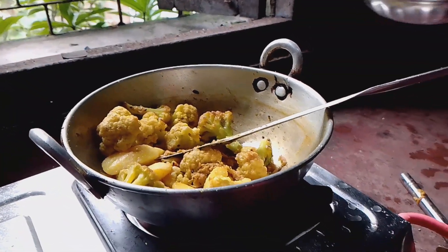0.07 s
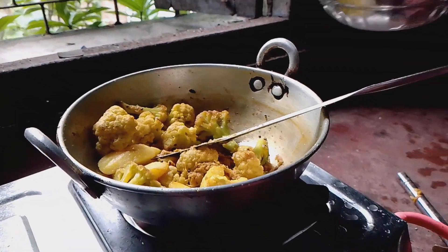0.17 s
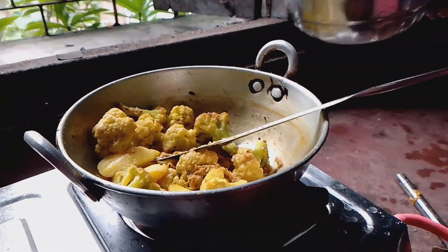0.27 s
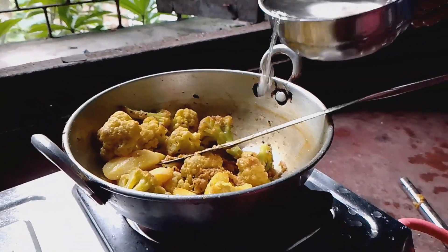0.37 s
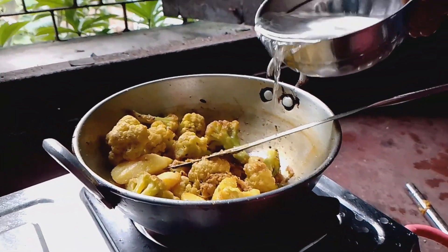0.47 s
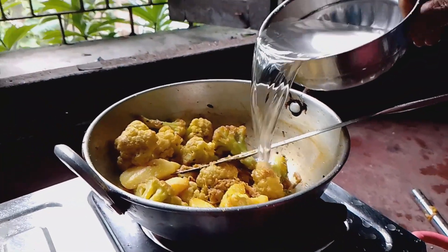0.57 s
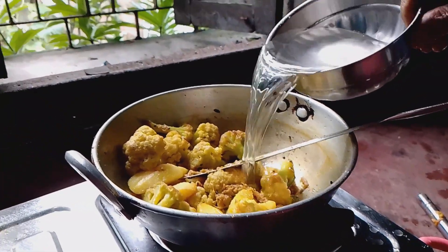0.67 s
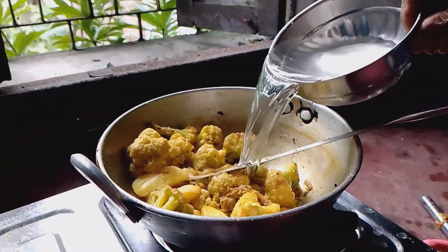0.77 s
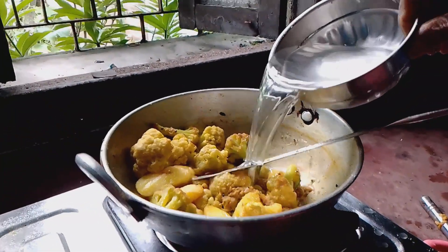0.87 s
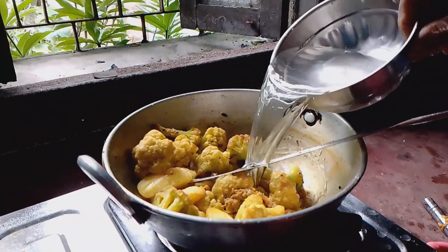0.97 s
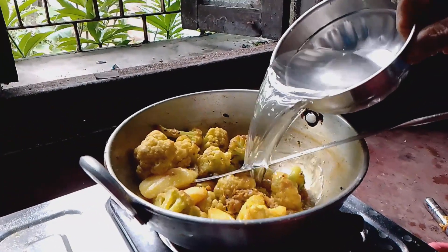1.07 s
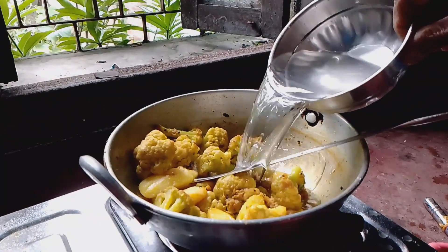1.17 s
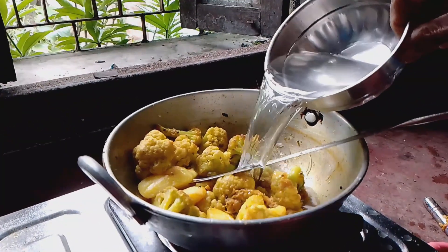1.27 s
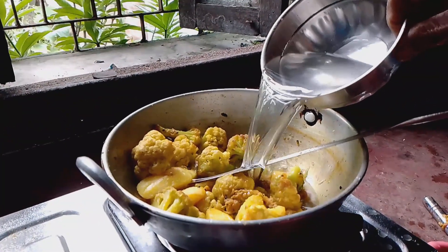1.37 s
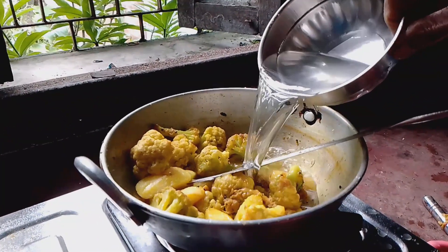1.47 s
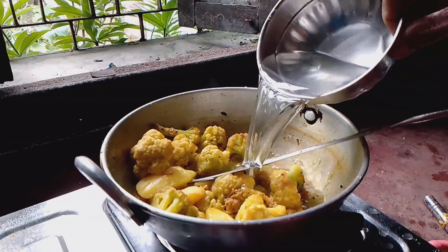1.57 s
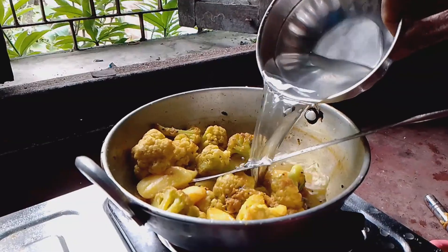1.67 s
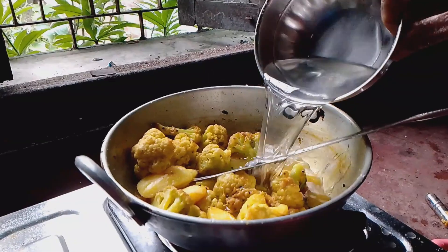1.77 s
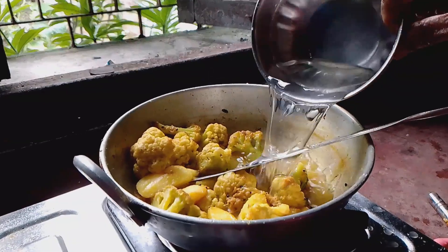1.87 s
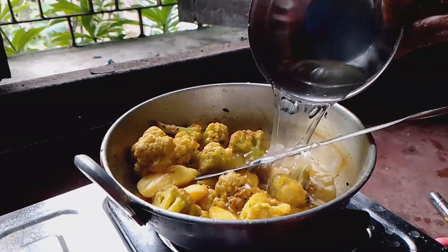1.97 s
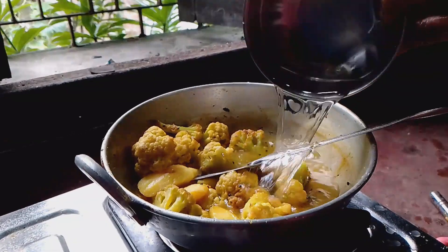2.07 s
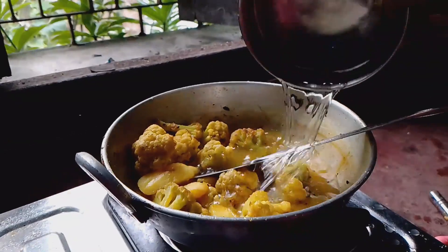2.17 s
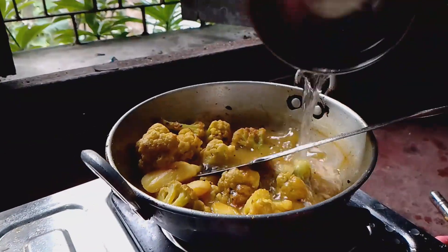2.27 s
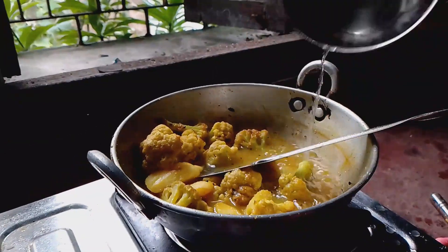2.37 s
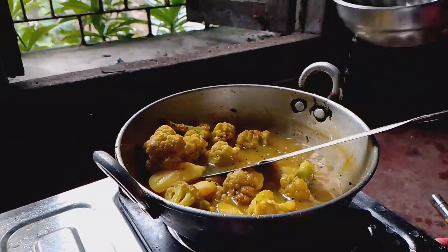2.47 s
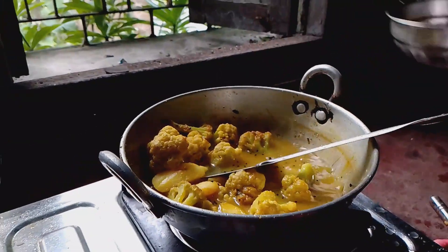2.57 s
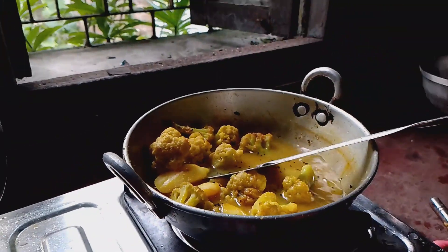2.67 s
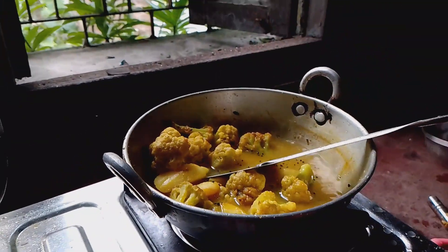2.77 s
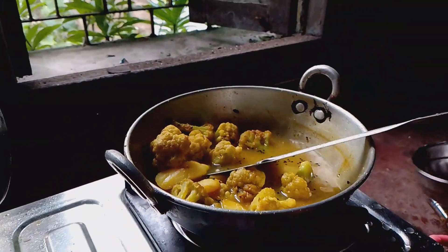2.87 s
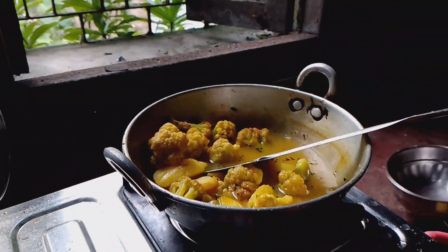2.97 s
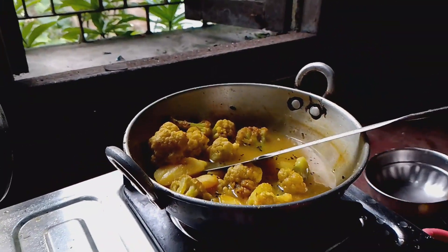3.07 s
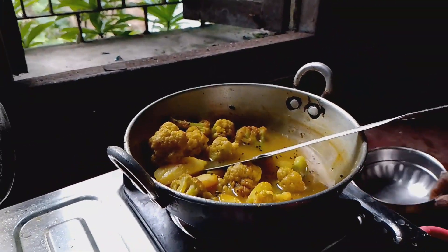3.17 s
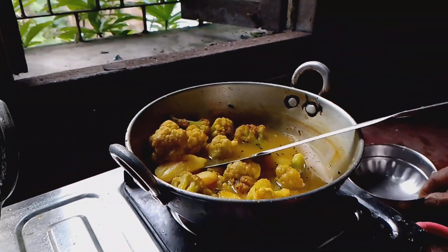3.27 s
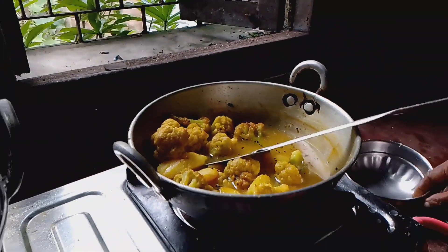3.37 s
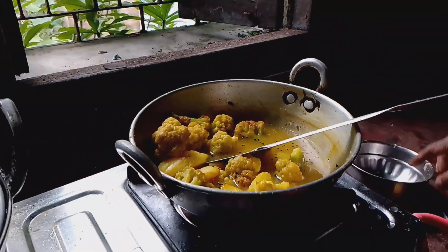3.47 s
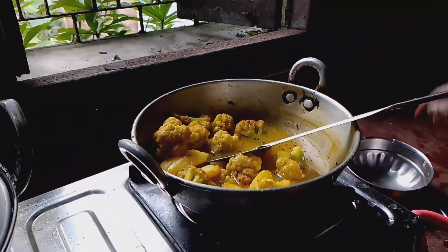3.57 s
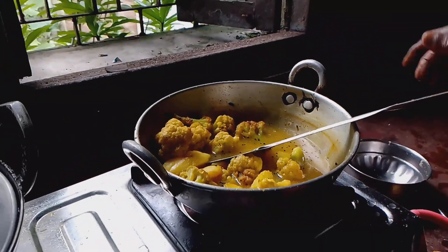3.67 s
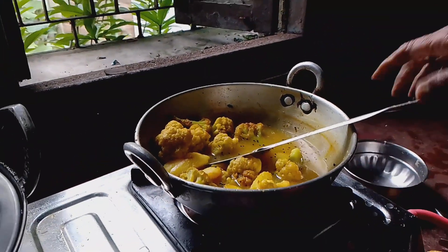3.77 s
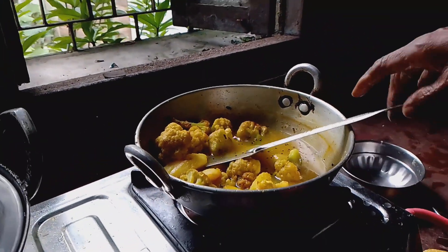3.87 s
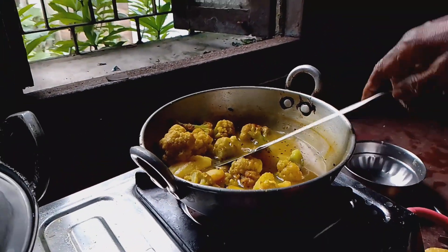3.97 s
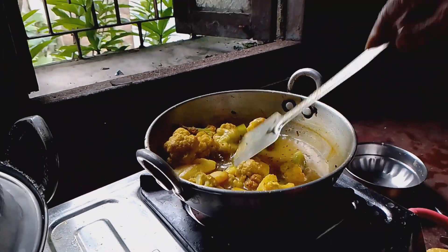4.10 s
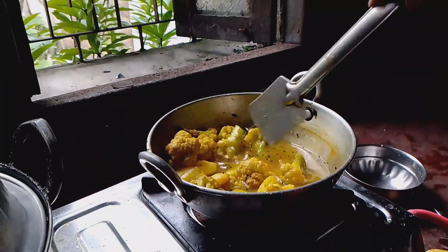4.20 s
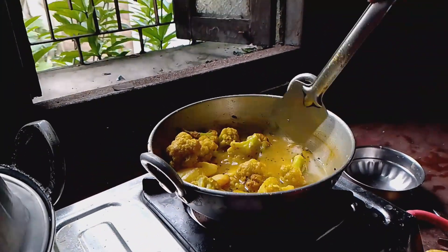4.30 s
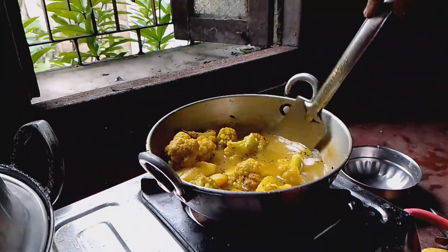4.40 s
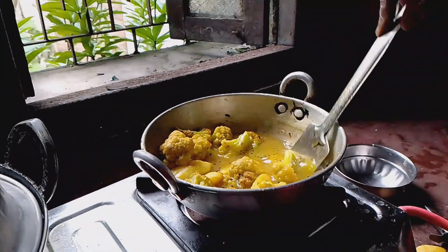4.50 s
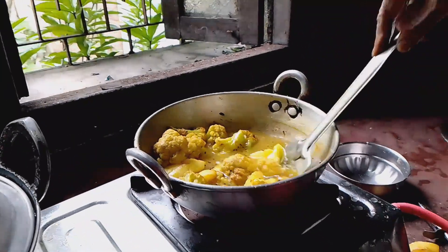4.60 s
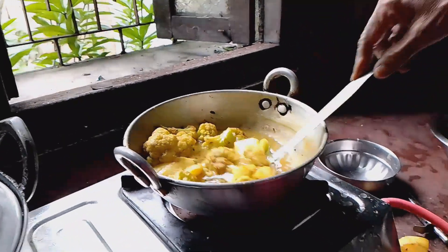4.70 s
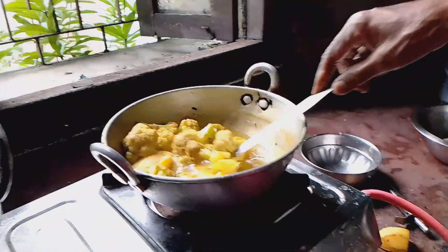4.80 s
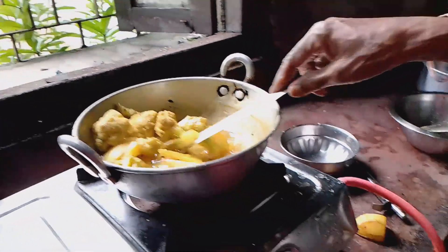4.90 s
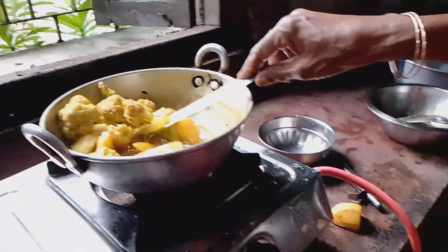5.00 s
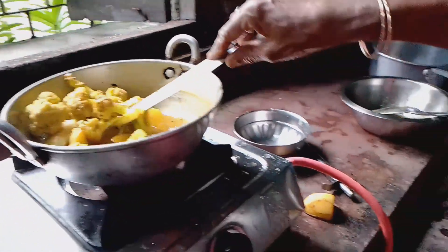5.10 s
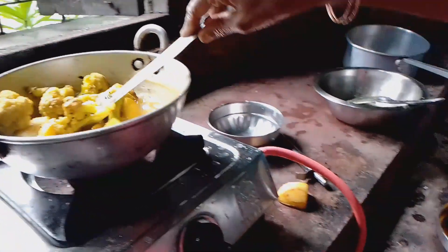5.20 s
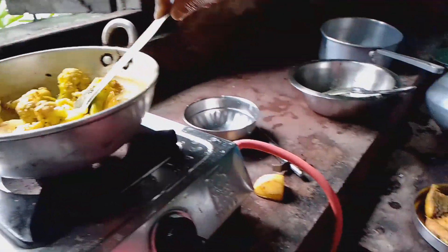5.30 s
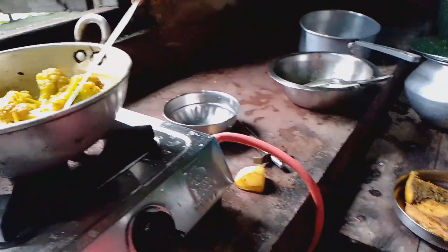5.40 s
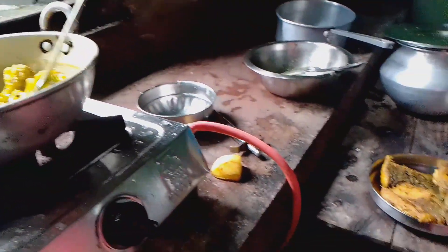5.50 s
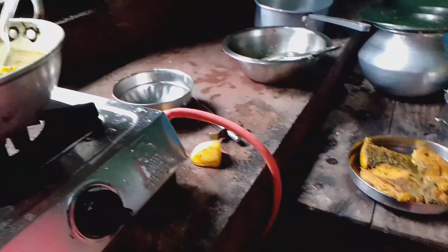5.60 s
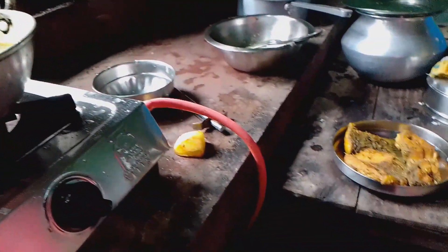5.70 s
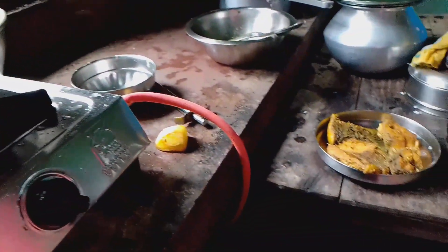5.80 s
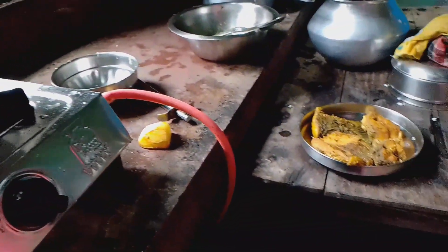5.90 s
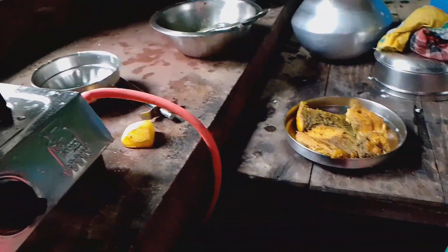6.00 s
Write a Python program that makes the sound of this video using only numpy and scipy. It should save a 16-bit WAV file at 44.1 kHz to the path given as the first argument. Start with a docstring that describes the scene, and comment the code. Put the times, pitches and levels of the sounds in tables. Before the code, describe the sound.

Close, in a small kitchen with a short, lively echo. Vegetables sizzle steadily in hot oil, a dense bright crackle over a faint gas-flame rush. From about 0.45 s first drops snap, and at 0.55 to 1 s poured water makes the frying flare into a loud steam hiss that climbs in pitch, with gurgling notes. The hiss falls away quickly; gurgles last until about 1.6 s, while drips and tiny spits thin out until about 2.8 s, leaving a soft simmer. At 3.3 s an empty steel bowl lands with a ringing clink, then rattles from 3.5 to 4 s. At 4.4 s a spatula knocks the pan brightly with a tiny squeak, its ring sliding downward as it sinks. Short gritty scrapes and light knocks follow until 5.7 s, with a dull tap near 5.4 s. At 5.9 s the blade clangs and rings, with a last scrape and squeak at 6 s.

```python
"""Vegetables sizzle in a steel pan over a gas burner in a small kitchen: coloured trains of tiny bursts.
Poured water makes the frying flare up as steam noise, gurgle (gliding tones) and die to a simmer.
The empty steel bowl is set down and rattles; a metal spatula knocks the pan, stirs and squeaks.
Blows excite decaying modes and a noisy clash; strokes rasp through moving resonances."""
import sys
import numpy as np
from scipy import signal
from scipy.fft import rfft, irfft
from scipy.io import wavfile

SR = 44100
rng = np.random.default_rng(int(sys.argv[2]) if len(sys.argv) > 2 else 0)


def put_to_file(sound):
    """Save the sound as 16-bit audio at rate SR, in the file named by the first command-line argument."""
    columns = np.atleast_2d(sound).T  # one column per channel
    safe = np.clip(columns, -1, 1)
    whole_steps = np.round(safe * 32767)
    wavfile.write(sys.argv[1], SR, whole_steps.astype(np.int16))


N = 266805
TIME = np.arange(N) / SR
BAND_EDGE_HZ = 15900

# Oil fries steadily until water quenches it; frying dies faster once the pan's bottom is covered.
OIL_DB, QUENCH_S, COOLING_DB_PER_S = -29.1, 0.97, 10.5
COVERED_S, DROWNING_DB_PER_S = 2.6, 1.5
# Gushes of water, a first spill then the full stream. Each row: start in seconds, length in seconds,
# level in dB.
GUSHES = [(0.561, .13, -29), (0.716, 0.27, -23.1)]
FLARE_ATTACK_S, FLARE_FALL_DB_PER_S = 0.079, 25
# Fine, hissing mist from the full stream, before the spray colour.
MIST_DB, MIST_ATTACK_S, MIST_LENGTH_S, MIST_FALL_DB_PER_S = -34, 0.095, 0.42, 29
# Levels relative to the oil or the flare.
OIL_SPRAY_DB, OIL_SPLASH_DB = -17, -13.5
STEAM_DB, STEAM_SPLASH_DB, STEAM_LAG_S = -8, -17, 0.077
# Steam hiss rises in pitch as water covers the hot metal.
STEAM_HZ, STEAM_RISE_HZ_PER_S, STEAM_RISE_S, STEAM_WIDTH_HZ = 4300, 1650, 0.6, 900
# Bands of the frying sputter independently.
SPUTTER_DB, SPUTTER_HZ = 1.5, 14
SIMMER_DB = -49
# Drips as the stream thins.
DRIBBLE_S, DRIBBLE_LENGTH_S = 1.5, 1.3
DRIP_DB, DRIP_FADE_DB_PER_S, DRIP_SPREAD_DB = -25, 6.5, 5
DRIP_HZ, DRIP_SAG_HZ_PER_S, DRIP_PITCH_SPREAD, DRIP_T60_S = 4640, 600, 0.18, 0.0094
# Droplets spit off the rim.
SPITS_PER_S, SPIT_DB, SPIT_ATTACK_S, SPIT_LENGTH_S, SPIT_FALL_DB_PER_S = 45, -53, .3, .9, 16
STROKE_ATTACK_S, STROKE_FALL_DB_PER_S = 0.018, 204
# The ringing blade slides into the gravy, whose weight pulls its modes down.
SINK_START_S, SINK_TIME_S, SINK_HOLD_S = 4.434, .13, 0.023

# Spectral shapes of the sources. Each row: frequency in Hz, relative level in dB per Hz.
FRY_COLOUR = [(880, -86), (1450, -7), (1650, -19), (1940, -1.5), (2100, -11), (2330, -2), (2540, -9),
              (2770, 0), (3050, -3), (3500, -.5), (3900, .5), (4550, 4), (5100, 0.5), (5550, 0), (6050, -4),
              (6450, -12.5), (7700, -29), (11700, -31.5), (19800, -88)]
SPRAY_COLOUR = [(3820, -21.5), (6500, -3), (7700, -8), (11000, -8.5), (13800, -21), (15100, -15),
                (16000, -20)]
SPLASH_COLOUR = [(300, -39), (500, -14), (800, 0.5), (1150, -5.5), (1450, 0), (1900, 0), (2400, 2.5),
                 (3500, -41)]
SIMMER_COLOUR = [(900, -35), (1600, -3.5), (2300, 2.5), (3000, -3.5), (4300, -3.5), (5500, -7),
                 (7500, -16.5), (10500, -19), (14000, -29), (16000, -32)]
FLAME_COLOUR = [(25, -38), (45, -20), (88, -18.5), (104, -4), (130, -11), (162, -30.5), (215, -1), (310, 0),
                (440, -3), (620, -8), (900, -7), (1600, -12.5), (2600, -12), (6000, -36)]
SPIT_COLOUR = [(1000, -25), (4000, 0), (7000, -7), (13500, -9), (16000, -18)]
BOWL_COLOUR = [(240, -38), (400, -13), (700, -14), (850, -6), (1400, -2), (1570, -11), (1800, 5),
               (2120, -20), (2500, -16), (3660, -18), (4600, -12), (5300, -24), (9000, -37), (14000, -44)]
RATTLE_COLOUR = [(650, -32), (1100, -18), (1450, -31), (1720, 2), (1900, -16), (2330, 2.5), (2620, -6.5),
                 (3010, -14), (3200, -7.5), (3900, -8.5), (4600, -10.5), (5580, -18), (6400, -17.5),
                 (7550, -27), (11200, -27), (16000, -55)]
STIR_COLOUR = [(350, -15), (600, -6), (1030, -4.5), (1220, -6.5), (1720, -6.5), (2050, 1.5), (2800, -2),
               (3600, -3.5), (4300, -9), (5000, -4), (6300, -13), (7500, -24), (9800, -33), (14000, -42)]
PAN_COLOUR = [(290, -19), (500, -11), (1080, -3), (1740, -9), (2430, 0.5), (2980, -4), (4030, -2.5),
              (4660, -1), (5310, -5.5), (6330, -4), (7530, -11), (8830, -12.5), (9490, -11.5), (12000, -16),
              (16000, -34)]
# Resonances of burner and pan that the flame sings in. Each row: frequency in Hz, width in Hz,
# rms level in dB.
FLAME_MODES = [(313.3, 43.3, -49), (398.5, 8.1, -58.5), (833, 42, -77), (1176, 47, -82), (1409, 116, -55.5)]
# Air pockets ringing in the water. Each row: start in seconds, length in seconds, start pitch in Hz,
# end pitch in Hz, level in dB.
GURGLES = [(0.149, 0.053, 2880, 2560, -37), (0.336, 0.026, 1520, 1570, -36.5),
           (0.882, 0.043, 2260, 2350, -30), (0.99, 0.062, 2490, 2700, -34), (1.05, 0.061, 1780, 1800, -37),
           (1.119, .06, 1777, 1947, -35), (1.279, 0.073, 1740, 1920, -33.5), (1.324, 0.1, 1910, 1946, -39),
           (1.473, 0.053, 2500, 2640, -28.5), (1.526, 0.037, 1990, 1830, -37.5),
           (1.55, 0.079, 1796, 1794, -31.5), (4.971, .05, 1163, 1284, -46)]
# Loudest drops of water. Each row: start in seconds, level in dB, pitch in Hz, T60 in seconds.
DROPS = [(0.451, -27, 4600, .006), (.473, -16.5, 4500, 0.019), (.523, -20, 4400, .006),
         (.61, -21, 5280, .012), (.68, -19, 4470, .015), (.793, -16, 4060, .015), (.835, -16, 4610, .025),
         (.905, -18, 4360, .025), (.958, -18, 4510, .025), (1.421, -23, 5220, .015),
         (1.462, -24, 5180, .015), (1.525, -20, 5100, 0.012), (1.752, -26.5, 5000, 0.014),
         (2.068, -28, 3640, 0.027), (2.154, -23.5, 4550, 0.026), (2.259, -25.5, 4100, 0.019),
         (2.508, -28.5, 4050, 0.009), (2.688, -24, 3850, 0.01)]
# Modes of ringing steel. Each row: frequency in Hz, relative level in dB, T60 in seconds.
BOWL_MODES = [(850, -15.5, 0.5), (970, -16, 0.4), (1200, -17, 0.38), (1400, -14, .25), (1836, -3.5, 0.72),
              (2220, -8.5, 0.58), (2480, -3.5, 0.33), (2500, -6, 0.22), (3030, -7, .24), (3300, -7.5, 0.57),
              (3470, -7, 0.38), (4180, -12, .2), (4420, -6, 0.2), (4705, -6.5, 0.3)]
RATTLE_MODES = [(1736, -4, 0.53), (2150, -10, 0.82), (2360, -7, 0.54), (2384, -4.5, 0.45), (2660, -14, .32),
                (2960, 1, 0.26), (2960, -3.5, 0.14), (3350, -8, 0.4), (3420, -13, 0.26), (3763, -10, .25),
                (3950, -13, .22), (4005, -9, .25), (4160, -9, .22), (4260, -14, .16), (4370, -7, .17),
                (4670, -11, 0.31), (5450, -11, .15), (5690, -14, 0.26), (6300, -24, .2)]
PAN_MODES = [(1100, -12, 0.13), (2300, -8, 0.2), (2440, -4, 0.14), (2730, -10, 0.2), (2870, -12, .16),
             (3230, -6, .2), (3410, -3, 0.21), (3680, -9, 0.2), (4020, -10, 0.22), (4290, -8, .18),
             (4560, -3, 0.22), (4800, -2, 0.22), (5080, -3, .18), (5370, 5, 0.14), (5560, -2, 0.14),
             (5760, -3, .15), (6820, -11, 0.3)]
BLADE_MODES = [(988, -4.5, 0.27), (2400, 1, 0.26), (3310, -15, .5), (3990, -4, 0.33), (4200, -3, 0.14),
               (5060, -2, .22), (5300, -3, .17), (5798, -6, 0.26), (6030, -2, 0.23), (6740, -9, 0.24),
               (9570, -3, 0.091)]
# Blows. Each row: start in seconds, ring level in dB, clash level in dB, clash T60 in seconds,
# frequency in Hz that the point of contact favours.
BOWL_HITS = [(3.273, -37, -19.5, 0.06, 1140), (3.283, -38, -33, 0.22, 1150),
             (3.306, -30, -34.5, 0.69, 3020), (3.324, -29.5, -41, 0.34, 2020)]
RATTLE_HITS = [(3.511, -27, -29.5, 0.17, 4660), (3.521, -30.5, -32.5, 0.34, 4800),
               (3.59, -38, -37, 0.2, 4600), (3.621, -40, -25.5, 0.033, 4600),
               (3.701, -34, -22, 0.064, 4050), (3.712, -24.5, -28, 0.13, 3800),
               (3.722, -27.5, -29, 0.38, 3700), (3.779, -35, -34, .08, 3600),
               (3.851, -44, -33.5, 0.1, 4400), (3.863, -39.5, -35, 0.1, 4300), (3.88, -42, -35, .12, 3300),
               (3.966, -39, -34, 0.07, 4400), (3.984, -36, -33, 0.1, 2470), (3.993, -40, -35, 0.046, 2600),
               (4.022, -46, -39, 0.088, 4400)]
PAN_HITS = [(4.423, -31, -23, 0.2, 4600), (4.435, -23, -21, 0.056, 3070), (4.441, -35, -36, 0.18, 3250),
            (4.476, -46, -38, 0.4, 5500), (4.548, -46, -33.5, 0.09, 4800), (5.304, -44, -34, 0.04, 3200),
            (5.38, -47, -35, .08, 5000), (5.409, -47, -39, 0.055, 5000), (5.469, -50, -39.5, 0.1, 4320),
            (5.48, -50, -38, 0.13, 4320)]
BLADE_HITS = [(5.881, -25.5, -26, 0.09, 4400), (5.901, -34, -32, 0.2, 4300),
              (5.991, -42, -32.5, 0.11, 10000)]
# Strokes of the spatula. Each row: start in seconds, length in seconds, scrape level in dB,
# rasp level in dB, rasp start in Hz, rasp end in Hz, rasp width in Hz.
STROKES = [(3.831, 0.079, -40, -52, 2300, 2400, 400), (3.96, 0.073, -42, -46, 2410, 2250, 400),
           (4.47, .12, -43, -46, 3000, 2400, 900), (4.654, .05, -45, -59, 2800, 3100, 600),
           (4.696, 0.028, -44, -45, 5200, 4960, 800), (4.734, 0.034, -42, -49, 3800, 3500, 1400),
           (4.776, .02, -43.5, -40, 1980, 2096, 360), (4.823, 0.025, -46, -50, 4900, 4650, 1000),
           (4.85, 0.032, -45, -47, 2900, 2650, 900), (4.925, .04, -45, -51, 3700, 2300, 600),
           (5.005, 0.03, -50, -51, 2600, 2980, 900), (5.084, 0.033, -49, -49, 3070, 2480, 900),
           (5.225, .04, -52, -49, 2300, 2500, 600), (5.3, .03, -46, -42, 2950, 2700, 350),
           (5.394, 0.085, -55, -48, 2400, 2200, 420), (5.645, 0.035, -68, -50, 2860, 2800, 300),
           (5.974, .07, -40.5, -38, 2510, 2490, 300)]
# Modes of the sinking blade. Each row: frequency in air in Hz, frequency sunk in Hz, width in Hz,
# level in dB, fall in dB per second.
SINKING_MODES = [(2740, 1980, 340, -34.5, 65), (3480, 3050, 260, -39, 102), (5700, 5250, 380, -37, 94)]
# Blade sticking and slipping on steel. Each row: start in seconds, length in seconds, pitch in Hz,
# level in dB.
SQUEAKS = [(4.4348, .008, 5625, -13), (4.4375, 0.002, 5470, -9), (5.988, 0.024, 2406, -17),
           (6.018, 0.021, 2393, -27)]
# Dull tap close by. One row: centre in seconds, level in dB before the high-pass, time scale in seconds.
TAP = (5.3625, -16, 0.00019)
# Room decay. Each row: frequency in Hz, T60 in seconds.
ROOM_T60 = [(200, 0.45), (1500, 0.56), (5000, 0.51), (14000, 0.48)]


def amp(db):
    """Decibels to gain."""
    return 10 ** (np.asarray(db) / 20)


def unit(x):
    """Scales to rms 1."""
    return x / np.sqrt(np.mean(x ** 2) + 1e-20)


def read(points, hz):
    """Interpolates a spectrum table on a log-frequency axis."""
    f, value = np.transpose(points)
    return np.interp(np.log(hz + 1), np.log(f), value)


def add(mix, s, sound):
    """Mixes a sound in at s seconds."""
    part = mix[round(s * SR):][:len(sound)]
    part += sound[:len(part)]


def tint(x, colour):
    """Multiplies the spectrum of x by a colour, at rms 1."""
    gain = amp(read(colour, np.fft.rfftfreq(len(x), 1 / SR)))
    return unit(irfft(rfft(x) * gain, len(x)))


def drift(rate_hz):
    """Low-passed noise of rms 1: a slow random wander."""
    hz = np.fft.rfftfreq(N, 1 / SR)
    return unit(irfft(rfft(rng.standard_normal(N)) / (1 + (hz / rate_hz) ** 4), N))


def resonate(x, hz, width_hz):
    """Steep resonance, fixed or moving, at rms 1: shift to 0 Hz, low-pass, shift back."""
    turn = np.exp(2j * np.pi * np.cumsum(hz * np.ones(N)) / SR)
    r = np.exp(-np.pi * width_hz / SR)
    return unit((turn * signal.lfilter([1], [1, -2 * r, r * r], x / turn)).real)


def swell(t, length_s, attack_s, fall_db_per_s):
    """Rises from t = 0, holds until length_s, then falls exponentially."""
    return np.clip(t / attack_s, 0, 1) * amp(-fall_db_per_s * np.maximum(t - length_s, 0))


def room(x, wet_db):
    """Adds the kitchen's echo: sparse reflections whose decay time varies with frequency."""
    t = TIME[:SR // 2]
    taps = rng.standard_normal(len(t)) * (rng.random(len(t)) < 1 / 10) * (t > .003)
    hz, frame_s, z = signal.stft(taps, SR, nperseg=256)
    fall = amp(-60 * frame_s / read(ROOM_T60, hz)[:, None])
    tail = signal.istft(z * fall, SR, nperseg=256)[1]
    echo = signal.fftconvolve(x, tail / np.linalg.norm(tail))[:N]
    return (x + amp(wet_db) * echo) / np.hypot(1, amp(wet_db))


def crackle(per_s, spread_db, cycles, count=60000):
    """Tiny bubbles burst at random, each a damped sine at its own pitch; a few are large."""
    when, pitch, chance, size, phase = rng.random((count, 5)).T
    at = (when * N).astype(int)
    rate = (per_s * np.ones(N))[at]
    # Dividing by root rate keeps the power steady as the density varies.
    size = amp(spread_db * np.minimum(-np.log(size), 4)) / np.sqrt(rate)
    hz = 600 + 14400 * pitch
    burst = chance < rate * N / SR / count
    at, hz, size, phase = (column[burst, None] for column in (at, hz, size, phase))
    age = np.arange(96)  # samples
    damping = np.minimum(hz, SR / 8) / cycles
    envelope = size * np.sqrt(damping) * np.exp(-damping * age / SR)
    rings = envelope * np.sin(2 * np.pi * (hz * age / SR + phase))
    return unit(np.bincount((at + age).ravel(), rings.ravel(), N)[:N])


def flare(t):
    """Each gush of water flashes into steam on the hot pan; powers add."""
    power = 0
    for s, length_s, db in GUSHES:
        power = power + (amp(db) * swell(t - s, length_s, FLARE_ATTACK_S, FLARE_FALL_DB_PER_S)) ** 2
    return np.sqrt(power)


def sputter(x, count=10):
    """Neighbouring bands of pitch swell and sink independently."""
    spectrum, place = rfft(x), np.log1p(np.fft.rfftfreq(N, 1 / SR))
    centres = np.log(np.geomspace(1400, 7000, count))
    out = np.zeros(N)
    for band in np.eye(count):
        part = irfft(spectrum * np.interp(place, centres, band), N)
        out += part * amp(SPUTTER_DB * drift(SPUTTER_HZ))
    return unit(out)


def frying():
    """Bursts crowd together in hot oil, flare up with the water and thin out as it cools the pan."""
    oil = amp(OIL_DB - COOLING_DB_PER_S * np.maximum(TIME - QUENCH_S, 0))
    gush, late_gush = flare(TIME), flare(TIME - STEAM_LAG_S)
    level_db = 20 * np.log10(np.hypot(oil, gush))
    bursts_per_s = 6000 * amp(.6 * np.clip(level_db + 31.5, -25, 5))
    bursts = room(crackle(bursts_per_s, spread_db=2.0, cycles=1.58), wet_db=-3)

    body_level = np.hypot(oil, amp(-1.5) * gush) * amp(-2.0 + .4 * drift(27))
    body = body_level * sputter(tint(bursts, FRY_COLOUR))

    stream_age = TIME - GUSHES[-1][0]
    steam_hz = STEAM_HZ + STEAM_RISE_HZ_PER_S * np.clip(stream_age, 0, STEAM_RISE_S)
    steam = amp(STEAM_DB) * late_gush * resonate(rng.standard_normal(N), steam_hz, STEAM_WIDTH_HZ)

    mist = amp(MIST_DB) * swell(stream_age, MIST_LENGTH_S, MIST_ATTACK_S, MIST_FALL_DB_PER_S)
    spray = np.hypot(amp(OIL_SPRAY_DB) * oil, mist) * tint(bursts, SPRAY_COLOUR)
    splash_level = np.hypot(amp(OIL_SPLASH_DB) * oil, amp(STEAM_SPLASH_DB) * late_gush)
    splash = splash_level * tint(bursts, SPLASH_COLOUR)

    drowning = amp(-DROWNING_DB_PER_S * np.maximum(TIME - COVERED_S, 0))
    return drowning * (body + steam + spray + splash)


def simmer():
    """Sparse soft bubbling at the edge of the gravy."""
    bursts = room(crackle(1500, spread_db=4.5, cycles=1.9), wet_db=6.5)
    return amp(SIMMER_DB + 0.46 * drift(9.9)) * tint(bursts, SIMMER_COLOUR)


def burner():
    """The flame's steady rush and the hollow notes it excites under the pan."""
    out = amp(-50.5) * tint(rng.standard_normal(N), FLAME_COLOUR)
    for hz, width_hz, db in FLAME_MODES:
        out += amp(db) * resonate(rng.standard_normal(N), hz, width_hz)
    return out


def dribble(count=30):
    """Rows like DROPS for the stream breaking up, softer and lower as the gravy deepens."""
    when, size, pitch = rng.random((count, 3)).T
    age = DRIBBLE_LENGTH_S * (np.arange(count) + when) / count
    db = DRIP_DB - DRIP_FADE_DB_PER_S * age - DRIP_SPREAD_DB * size
    hz = (DRIP_HZ - DRIP_SAG_HZ_PER_S * age) * (1 + DRIP_PITCH_SPREAD * (pitch - .5))
    return [(DRIBBLE_S + a, level, f, DRIP_T60_S) for a, level, f in zip(age, db, hz)]


def water():
    """Wavering notes of trapped air, and drops that snap and ring briefly."""
    notes, drops, waver = np.zeros(N), np.zeros(N), drift(90)
    for s, length_s, start_hz, end_hz, db in GURGLES:
        size = round(length_s * SR)
        hz = np.linspace(start_hz, end_hz, size) * (1 + 0.0066 * waver[round(s * SR):][:size])
        note = np.sin(2 * np.pi * np.cumsum(hz) / SR)
        add(notes, s, amp(db) * signal.windows.tukey(size, .5) * note)
    t = TIME[:SR // 20]
    for s, db, hz, t60_s in list(DROPS) + dribble():
        snap = 0.47 * tint(rng.standard_normal(len(t)), FRY_COLOUR) * np.exp(-t / 0.0011)
        ring = np.sin(2 * np.pi * hz * t) * amp(-60 * t / t60_s)
        add(drops, s, amp(db) * (ring + snap) * (1 - np.exp(-t / .0001)))
    return room(notes * amp(1 * drift(40)) + drops, wet_db=-19)


def spits():
    """As the hiss thins out, single droplets spit off the hot rim."""
    ticks = room(crackle(SPITS_PER_S, spread_db=3.5, cycles=1.2), wet_db=-10)
    level = amp(SPIT_DB) * swell(TIME - DRIBBLE_S, SPIT_LENGTH_S, SPIT_ATTACK_S, SPIT_FALL_DB_PER_S)
    return level * tint(ticks, SPIT_COLOUR)


def struck(hits, modes, colour, treble_hz, echo_db, echo_t60, favour_db, beat, size=32768):
    """Each blow feeds the clear modes, and a clash of dense, short ones that lingers in the room."""
    out, t = np.zeros(N), TIME[:size]
    hz, db, t60_s = np.transpose(modes)
    energy = np.zeros((len(hz), N))
    decay, rise = amp(-60 * t / t60_s[:, None]), 1 - np.exp(-t / 0.0007)
    low_pass = signal.butter(2, min(treble_hz, SR / 3), fs=SR, output="sos")
    for s, ring_db, clash_db, clash_t60_s, contact_hz in hits:
        favour = [(contact_hz / 2, 0), (contact_hz, favour_db), (contact_hz * 2, 0)]
        weight = amp(db + read(favour, hz))
        gains = amp(ring_db) * weight / np.linalg.norm(weight)
        for stored, gain, fall in zip(energy, gains, decay):
            add(stored, s, (gain * fall * rise) ** 2)
        dense = tint(tint(rng.standard_normal(size), colour), favour)
        dull = np.roll(signal.sosfilt(low_pass, dense), size // 2)  # rolled to decorrelate
        clash = dense * amp(-60 * t / clash_t60_s) + dull * amp(echo_db - 60 * t / echo_t60)
        add(out, s, amp(clash_db) * clash * rise)
    # Round vessels ring in close pairs of modes, which beat.
    for stored, f in zip(energy, hz):
        live = stored > 0
        split, start, twin_start = rng.random(3)
        twin_hz = f + 12 + 30 * split
        mode = np.sin(2 * np.pi * (f * TIME[live] + start))
        twin = np.sin(2 * np.pi * (twin_hz * TIME[live] + twin_start))
        out[live] += np.sqrt(2 * stored[live]) * (mode + beat * twin) / np.hypot(1, beat)
    return out


def bowl():
    """The empty bowl lands on the counter, then rattles as it is pushed into place."""
    landing = struck(BOWL_HITS, BOWL_MODES, BOWL_COLOUR, treble_hz=3100,
                     echo_db=-13.0, echo_t60=0.6, favour_db=7.0, beat=0.51)
    rattle = struck(RATTLE_HITS, RATTLE_MODES, RATTLE_COLOUR, treble_hz=5000,
                    echo_db=-10.5, echo_t60=0.48, favour_db=10.5, beat=0.56)
    return landing + rattle


def stirring():
    """Each stroke drags grit under the blade, which rasps at a pitch that glides as it moves."""
    grit = room(crackle(2200, spread_db=3.5, cycles=2.6), wet_db=4.5)
    grit *= amp(1.1 * drift(40))
    scrape, out = tint(grit, STIR_COLOUR), np.zeros(N)
    for s, length_s, scrape_db, rasp_db, start_hz, end_hz, width_hz in STROKES:
        rasp_hz = np.interp(TIME, [s, s + length_s], [start_hz, end_hz])
        rasp = resonate(grit, rasp_hz, width_hz)
        stroke = swell(TIME - s, length_s, STROKE_ATTACK_S, STROKE_FALL_DB_PER_S)
        out += stroke * (amp(scrape_db) * scrape + amp(rasp_db) * rasp)
    return out


def spatula():
    """Knocks on the pan, the blade ringing as it is let go, and its strokes through the vegetables."""
    knocks = struck(PAN_HITS, PAN_MODES, PAN_COLOUR, treble_hz=7100,
                    echo_db=-14.0, echo_t60=0.7, favour_db=9.0, beat=0.91)
    clang = struck(BLADE_HITS, BLADE_MODES, PAN_COLOUR, treble_hz=7000,
                   echo_db=-7, echo_t60=0.71, favour_db=3.5, beat=0.77)
    return knocks + clang + sinking() + stirring()


def sinking():
    """The blade skids down the pan's wall; its ring slides down and fades as it dips into the gravy."""
    dry_share = np.exp(-np.maximum(TIME - SINK_START_S, 0) / SINK_TIME_S)
    out = np.zeros(N)
    for air_hz, sunk_hz, width_hz, db, fall_db_per_s in SINKING_MODES:
        hz = sunk_hz + (air_hz - sunk_hz) * dry_share
        ring = resonate(rng.standard_normal(N), hz, width_hz)
        out += amp(db) * swell(TIME - SINK_START_S, SINK_HOLD_S, STROKE_ATTACK_S, fall_db_per_s) * ring
    return out


def squeaks():
    """Stick-slip locks onto one mode of the blade for a moment."""
    out = np.zeros(N)
    for s, length_s, hz, db in SQUEAKS:
        t = TIME[:round(length_s * SR)]
        add(out, s, amp(db) * signal.windows.tukey(len(t), .4) * np.sin(2 * np.pi * hz * t))
    return room(out * amp(.8 * drift(200)), wet_db=-10.5)


def tap():
    """One push and pull of air, with no ring."""
    s, db, scale_s = TAP
    u = (TIME - s) / scale_s
    pulse = -amp(db) * np.pi * u / (1 + u * u / 2) ** 2 / 2
    return signal.sosfilt(signal.butter(2, 360, "highpass", fs=SR, output="sos"), pulse)


def scene():
    """Sums all sources, identical in both channels."""
    cooking = frying() + simmer() + burner() + water() + spits()
    mix = cooking + bowl() + spatula() + squeaks() + tap()
    return np.array([mix, mix])


def record(dry):
    """Limits the band with a steep linear-phase low-pass."""
    low_pass = signal.firwin(511, BAND_EDGE_HZ, window=("kaiser", 9), fs=SR)
    return signal.oaconvolve(dry, low_pass[None], "same")


dry = scene()
out = record(dry)
put_to_file(out)
```